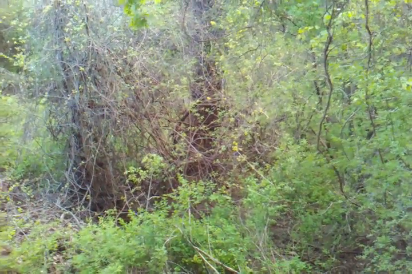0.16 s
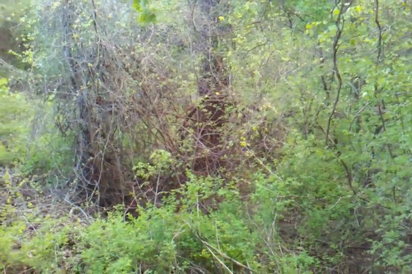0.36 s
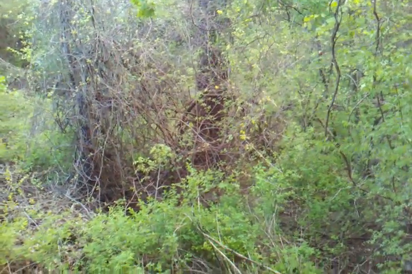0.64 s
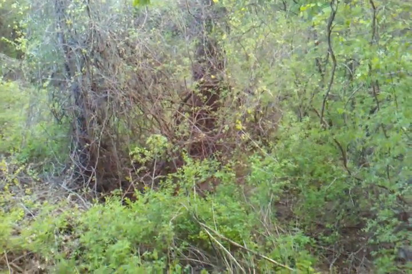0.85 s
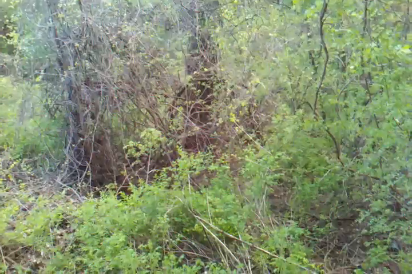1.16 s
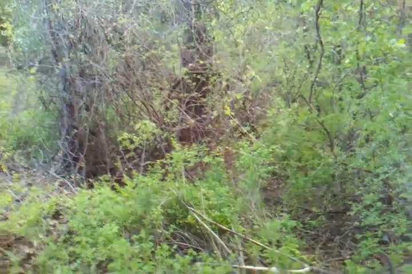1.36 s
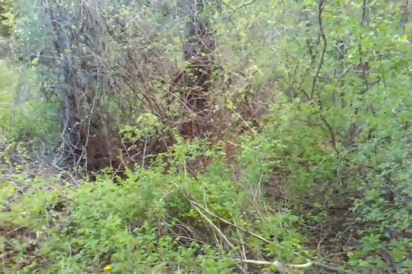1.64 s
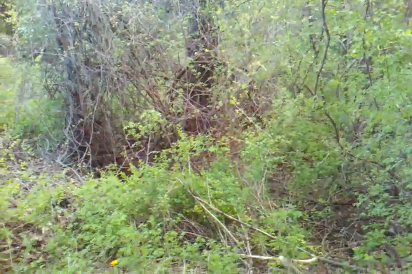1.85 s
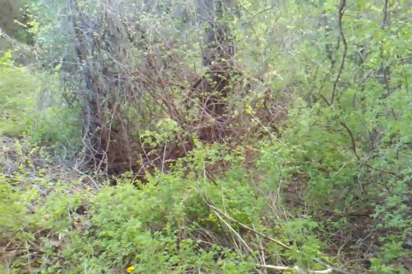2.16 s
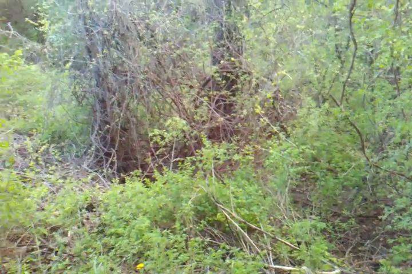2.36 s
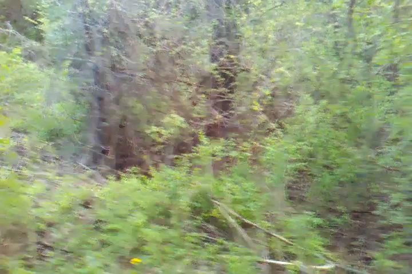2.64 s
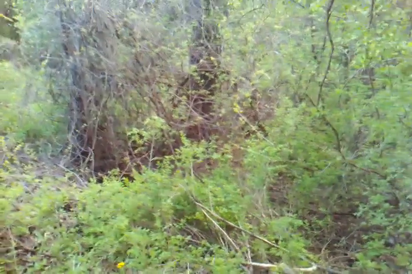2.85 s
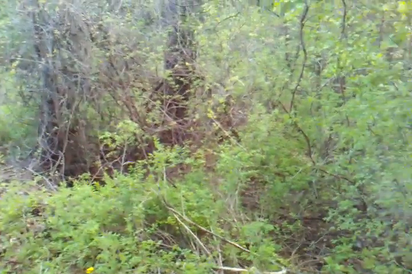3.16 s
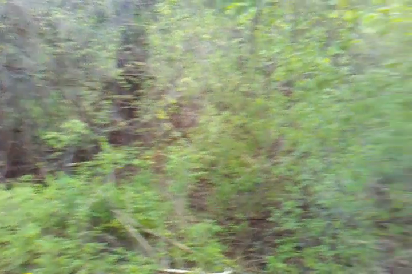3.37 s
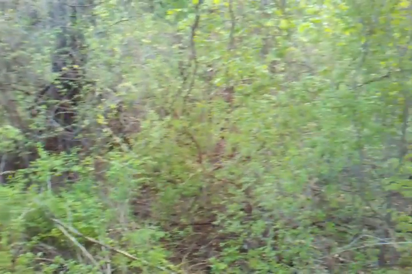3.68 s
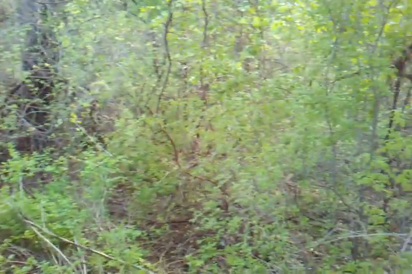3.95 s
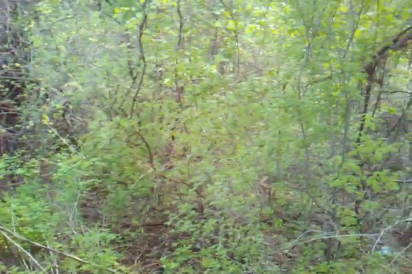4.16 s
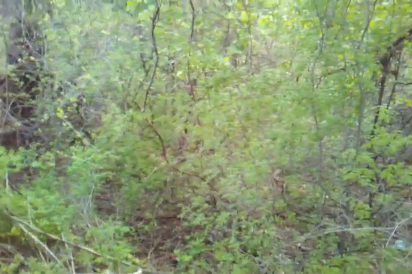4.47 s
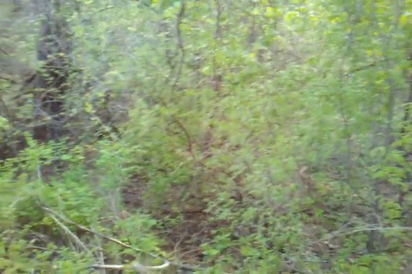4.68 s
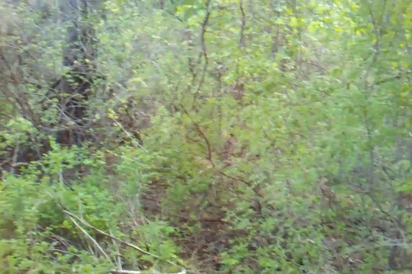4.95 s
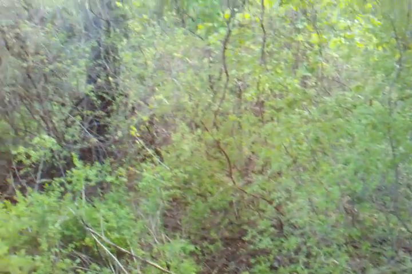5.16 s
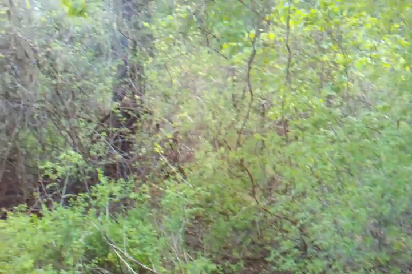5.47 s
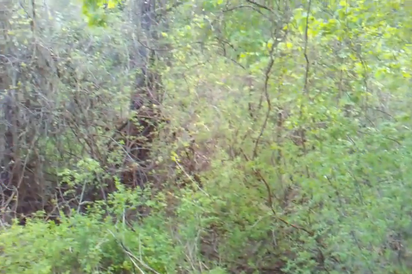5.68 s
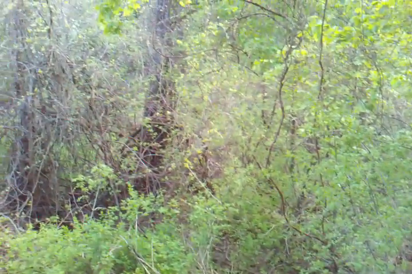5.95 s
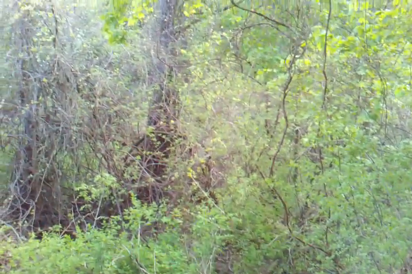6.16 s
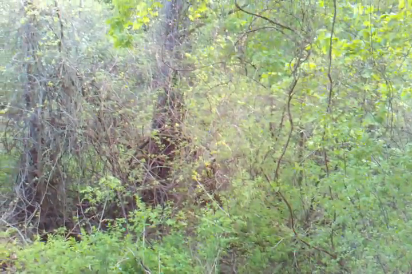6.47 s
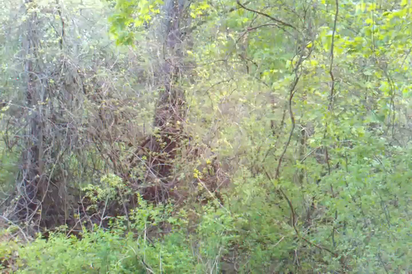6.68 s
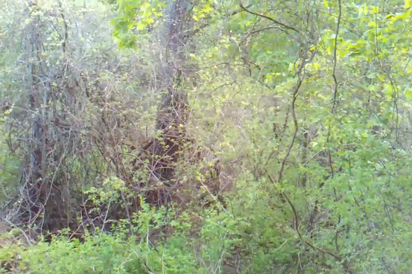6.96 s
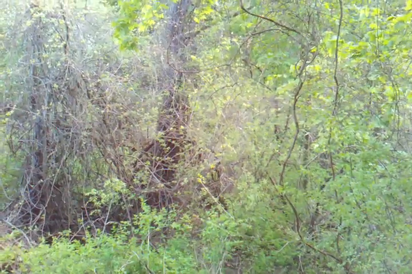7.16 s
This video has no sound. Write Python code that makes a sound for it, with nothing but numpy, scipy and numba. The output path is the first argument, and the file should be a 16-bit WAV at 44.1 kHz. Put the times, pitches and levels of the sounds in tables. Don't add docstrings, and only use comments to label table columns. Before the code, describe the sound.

A fox's hoarse scream is already ending as it begins, its echo fading among trees. Three faint breathy crow caws follow far off, with low engine notes barely audible. Then small dry rustles, fabric rubs and sharp little twig clicks come very near the wide stereo microphone. It calms, and late on a second raspy, rising scream bursts out and decays through the wood, over quiet wind, traffic rumble and fine leaf hiss.

```python
import sys
import numpy as np
from scipy import signal
from scipy.fft import rfft, irfft, next_fast_len
from scipy.io import wavfile
from scipy.ndimage import uniform_filter1d
from numba import njit

SR = 44100
rng = np.random.default_rng(int(sys.argv[2]) if len(sys.argv) > 2 else 0)


def voltage_ratio(decibels):
    exponent = np.asarray(decibels, float) / 20
    return 10 ** exponent


def persist_wave(psi):
    counts = np.round(np.clip(psi, -1, 1) * 32767).astype(np.int16)
    wavfile.write(sys.argv[1], SR, np.atleast_2d(counts).T)


N = 322750
LEAD = SR // 5


def at_hz(points, hz):
    point_hz, value = np.array(points).T
    return np.interp(np.log(hz + 1), np.log(point_hz), value)


def rms_one(x):
    return x / np.sqrt(np.mean(x ** 2) + 1e-20)


def in_time(tables, lead=0):
    t = np.arange(-lead, N) / SR
    rows = np.array([row for table in tables for row in table], float)
    columns = [np.interp(t, rows[:, 0], column) for column in rows[:, 1:].T]
    sounding = np.zeros(len(t), bool)
    for table in tables:
        start = table[0][0] if table[0][0] > 0 else -1
        sounding |= (t >= start) & (t <= table[-1][0])
    return [uniform_filter1d(sounding * 1., size=400)] + columns


def coloured(x, spectrum):
    size = next_fast_len(x.shape[-1])
    gain = voltage_ratio(at_hz(spectrum, np.fft.rfftfreq(size, 1 / SR)))
    return irfft(rfft(x, size) * gain, size)[..., :x.shape[-1]]


def band(x, low_hz, high_hz):
    return signal.sosfilt(signal.butter(2, [low_hz, high_hz], "band", fs=SR, output="sos"), x)


def drift(rate_hz, size):
    r = np.exp(-2 * np.pi * rate_hz / SR)
    return rms_one(signal.lfilter([1], [1, -2 * r, r * r], rng.standard_normal(size + SR))[SR:])


@njit
def resonate(x, hz, r):
    y = np.zeros(len(x))
    for i in range(2, len(x)):
        push = (1 - r * r) / 2 * (x[i] - x[i - 2])
        y[i] = push + 2 * r * np.cos(2 * np.pi * hz[i] / SR) * y[i - 1] - r * r * y[i - 2]
    return y


def steep(x, hz, width_hz):
    hz = hz + np.zeros(len(x))
    once = resonate(x, hz, np.exp(-np.pi * width_hz / SR))
    return rms_one(resonate(once, hz, np.exp(-2.5 * np.pi * width_hz / SR)))


def even(x, seconds):
    return x / np.sqrt(uniform_filter1d(x ** 2, size=int(seconds * SR)) + 1e-9)


# (frequency [Hz], density [dB per Hz])
AIR_SUM = [(30, -105), (70, -83.5), (130, -76), (500, -93.5), (1200, -104), (2000, -111), (4000, -117),
           (6000, -114), (8500, -106), (10500, -113), (14000, -113)]
AIR_DIFFERENCE = [(30, -110), (70, -103), (130, -89.5), (500, -101), (1000, -106), (2500, -115),
                  (4000, -112), (6000, -117), (8500, -109), (10500, -111), (14000, -112)]


def air():
    white = rng.standard_normal((2, N)) * np.sqrt(SR / 2)
    both = np.array([coloured(white[0], AIR_SUM), coloured(white[1], AIR_DIFFERENCE)])
    return both * voltage_ratio(0.16 * drift(0.36, N))


# (start [s], length [s], first pitch [Hz], last pitch [Hz], level [dB])
DRONE_NOTES = [
    (0.962, 0.58, 300, 307, -70.5),
    (1.608, 0.63, 323, 349.4, -74),
    (1.703, 0.586, 203, 218.4, -65.5),
]


def drone():
    out, t = 0, np.arange(N) / SR
    edge_s = .04
    for start, length, first_hz, last_hz, level_db in DRONE_NOTES:
        on = np.clip(np.minimum(t - start, start + length - t) / edge_s, 0, 1)
        hz = np.interp(t, [start, start + length], [first_hz, last_hz]) + 4.07 * drift(2.96, N)
        level = voltage_ratio(level_db + 7.5 + 2.8 * drift(27, N))
        out = out + on * level * np.sin(2 * np.pi * np.cumsum(hz) / SR)
    return out * np.array([[1], [.3]])


# (time [s], bright ring level [dB], bright ring [Hz], stem ring level [dB], stem ring [Hz])
TWIG_TICKS = [(1.942, -47, 7800, -73, 1290), (1.9913, -48, 7600, -67, 1349),
              (2.2894, -21.5, 7070, -38.5, 1457), (2.6702, -76, 3420, -45.5, 1620),
              (3.031, -51, 4240, -41, 1910), (3.5194, -63, 3600, -61, 1500), (3.74, -46, 4050, -60, 1840),
              (3.7588, -69, 3600, -47, 1680), (3.848, -57, 7000, -60, 1730),
              (4.1531, -27.5, 4080, -77, 1860), (4.275, -47.5, 7500, -72, 2050),
              (4.3062, -49, 7300, -61, 2040)]


def ticks():
    out, t = np.zeros((2, N)), np.arange(600) / SR
    chance = rng.standard_normal((len(TWIG_TICKS), 2, 600))
    shape = t / 0.00044 * np.exp(1 - t / 0.00039)
    snap_db = 1
    for (start, bright_db, bright_hz, stem_db, stem_hz), noise in zip(TWIG_TICKS, chance):
        crack = (bright_hz / 7000) ** 3 * rms_one(band(noise, 5000, 11700))
        bright = np.sin(2 * np.pi * bright_hz * t) + 0.31 * np.sin(np.pi * 1.05 * bright_hz * t)
        bright = bright + .5 * crack + 0.31 * rms_one(band(noise, 2960, 8800))
        stem = np.sin(2 * np.pi * stem_hz * t) * np.exp(-t / 0.0015)
        stem = stem + np.sin(2 * np.pi * 1.806 * stem_hz * t) * np.exp(-t / 0.002)
        snap = voltage_ratio(stem_db + snap_db) * band(np.exp(-t / 0.00006), 945, 8200) * 2.7
        tick = voltage_ratio(bright_db) * bright * shape + voltage_ratio(stem_db) * stem + snap
        at = round(start * SR)
        out[:, at:at + 600] += voltage_ratio(-4) * tick * [[1], [.5]]
    return out


# (start [s], length [s], peak hiss [dB], rub re hiss [dB], dull rub re hiss [dB])
STROKES = [(1.935, 0.022, -59, -7, -26), (2.34, 0.18, -64, 1.5, 3), (2.56, 0.07, -64, 0.5, 3.5),
           (3.022, 0.068, -54.5, -16, -1.5), (3.09, 0.1, -46, -6, -2), (3.232, 0.11, -49.5, 1.5, -3.5),
           (3.325, 0.13, -51, 2.5, -1), (3.728, 0.061, -63, -1, 6), (4.151, 0.016, -64, 5, -10.5),
           (4.274, 0.015, -54, -1, -16), (4.411, 0.22, -42.5, -12, -7), (5.256, 0.063, -63, -1, -18.5)]
DRAGS = [(1.77, .16, -70, -12, -14), (1.96, 0.37, -69, -3, -1), (2.9, 0.14, -57.5, -3, -2),
         (3.48, .07, -65.5, -1, 8.5), (3.62, 0.11, -65.5, 2.5, 7.5), (3.19, 0.046, -60, -3, -3),
         (4.043, 0.11, -45, -9, -16), (4.15, 0.088, -51, -0.5, -5.5), (4.29, 0.039, -53.5, 0, -6),
         (4.33, 0.12, -55.5, -10.5, -4.5), (5.15, .07, -69, -11, -9)]
# (share of length [0-1], level re peak [dB])
STROKE_COURSE = [(0, -8.5), (.15, -1.1), (.55, -1.55), (1, -20.5)]
DRAG_COURSE = [(0, -4.5), (.15, -5), (.65, 0.1), (1, -14)]


def pressure():
    gains = np.zeros((4, N))
    for touches, course in ((STROKES, STROKE_COURSE), (DRAGS, DRAG_COURSE)):
        for start, length, db, middle_db, low_db in touches:
            share = np.arange(int(length * SR)) / (length * SR)
            push = voltage_ratio(db + np.interp(share, *np.transpose(course)))
            top_db = -7 - 0.34 * max(middle_db, -18)
            layers = voltage_ratio(np.array([0, top_db, middle_db, low_db]))
            at = int(start * SR)
            gains[:, at:at + len(share)] += layers[:, None] * push
    return uniform_filter1d(gains, size=200)


# (frequency [Hz], level [dB])
FIBRE_HISS = [(5200, -10), (6300, 4.5), (7500, 8.5), (8700, 1), (9500, -30), (10500, -49)]
FIBRE_TOP = [(7800, -36.5), (8800, -5), (10000, -6), (12000, -9), (14000, -16.5)]


def strokes():
    hiss_gain, top_gain, middle_gain, low_gain = pressure()
    grains = rng.standard_normal((2, N)) * voltage_ratio(1.5 * rng.exponential(1, (2, N)))
    hiss = rms_one(coloured(grains, [(3500, -97)] + FIBRE_HISS)) * voltage_ratio(0.63 * drift(65, N))
    top = voltage_ratio(3.0) * rms_one(coloured(grains, FIBRE_TOP)) * voltage_ratio(1.2 * drift(50, N))
    middle = voltage_ratio(-8.5) * rms_one(band(band(grains, 3460, 6550), 3370, 6200)) * np.array([[1], [.6]])
    low = voltage_ratio(-8.5) * rms_one(band(band(grains, 1220, 2680), 920, 3260)) * np.array([[1], [.7]])
    return voltage_ratio(-3.5) * (hiss_gain * hiss + top_gain * top + middle_gain * middle + low_gain * low)


# (frequency [Hz], time to fall 60 dB [s])
WOODS_T60 = [(400, 0.51), (1200, 0.49), (2200, 0.63), (4500, 0.45), (9000, 0.64)]
# (frequency [Hz], level [dB])
WOODS_COLOUR = [(600, -6), (1200, 17.5), (2200, 8.5), (4000, 21), (8000, 3.5)]
# (frequency [Hz], level [dB])
FAR_TREES = [(800, -22), (1060, -5.5), (1170, -6.5), (1285, -10.5), (1700, -14), (2500, -8.5),
             (4000, -12.5), (7000, -45)]


def woods(x):
    t = np.arange(int(1.6 * SR)) / SR
    edges_hz = 300 * 2 ** np.arange(0, 5.6, .5)
    white, echoes = rng.standard_normal((2, 2, len(t))), 0
    for low, high in zip(edges_hz, edges_hz[1:]):
        fall = voltage_ratio(-60 * t / at_hz(WOODS_T60, np.sqrt(low * high)))
        echoes = echoes + band(white[0], low, high) * fall
    near = coloured(echoes, WOODS_COLOUR) * (1 - np.exp(-t / 0.0035))
    swell = 1 - np.exp(-(t / 0.23) ** 3)
    late = coloured(white[1], FAR_TREES) * voltage_ratio(7.5 - 60 * t / 1.25) * swell
    return signal.fftconvolve(x[None], near + late)[:, :len(x)] / np.sqrt(SR)


# (centre [Hz], width [Hz], level [dB])
RASP = [(2850, 600, 19), (3600, 263, 15), (4720, 2200, -7), (5150, 170, -36)]
# (centre [Hz], width [Hz])
CHEST = (938, 230)
# (time [s], upper resonance [Hz], level re second [dB], top [Hz], level re rasp [dB])
UPPER_THROAT = [(.5, 2180, -7, 7240, -8), (5.0, 2090, -24, 6400, -8.5)]
# (time [s], resonance [Hz], level re rasp [dB])
LIPS = [(.5, 4080, -6), (5.0, 4126, -13)]


def voice(tables, jitter, breath, throb_db, width_hz, second_width_hz, upper_db):
    size = N + LEAD
    on, level_db, low_hz, second_hz, second_db, rasp_db, chest_db = in_time(tables, LEAD)
    chaos = np.clip((rasp_db + 36) / 16, .35, 1)
    phase = np.cumsum(low_hz * (1 + chaos * jitter * drift(150, size))) / SR
    pulses = rms_one(np.diff(np.floor(phase), prepend=0) * voltage_ratio(1.3 * drift(450, size)))
    source = (pulses + chaos * breath * rng.standard_normal(size)) * voltage_ratio(throb_db * drift(89, size))

    second_hz = second_hz * (1 + .025 * drift(9.4, size))
    low_hz = low_hz * (1 + .015 * drift(25.4, size))
    low = even(steep(source, low_hz, width_hz) + .45 * steep(source, low_hz, 35), .025)
    second = even(steep(source, second_hz, second_width_hz) + .35 * steep(source, second_hz, 40), .025)
    strain = np.clip((rasp_db + 23) / 9, 0, 1)
    low = low * voltage_ratio(-4.5 * strain) + strain * voltage_ratio(-4.5) * steep(source, 1.18 * low_hz, 450)

    _, lips_hz, lips_db = in_time([LIPS], LEAD)
    _, upper_hz, mouth_db, top_hz, top_db = in_time([UPPER_THROAT], LEAD)
    upper = voltage_ratio(mouth_db + upper_db) * steep(source, upper_hz, 250)
    rasp = rms_one(sum(voltage_ratio(db) * steep(source, hz, width) for hz, width, db in RASP))
    rasp = rasp + voltage_ratio(top_db) * steep(source, top_hz, 520) + voltage_ratio(lips_db) * steep(source, lips_hz, 500)
    chest = voltage_ratio(chest_db) * even(steep(source, *CHEST), 0.019)
    throat = low + chest + voltage_ratio(second_db) * (second + upper) + voltage_ratio(rasp_db + 4.5) * rasp
    return on * voltage_ratio(level_db) * throat


# (start [s], length [s], peak level [dB], low resonance [Hz])
CAWS = [
    (0.638, 0.27, -50, 1372),
    (1.329, 0.21, -50.5, 1377),
    (2.01, 0.22, -51, 1335),
]
# (share of length [0-1], level re peak [dB], low resonance re its top [ratio],
# second resonance [Hz], effort as second resonance level [dB])
CAW_SHAPE = [(0, -16, 1, 1500, 0), (.17, -4.5, .99, 1900, -12), (0.361, -7, .98, 1950, -8),
             (.58, -16.5, .9, 1688, 3.5), (.82, -13, 0.98, 1550, 0), (1, -15.5, 0.97, 1480, 3)]


def crow():
    rasp_db, chest_db = -23, -40
    throat = [[(start + share * length, db + drop, hz * ratio, second_hz, second_db, rasp_db, chest_db)
               for share, drop, ratio, second_hz, second_db in CAW_SHAPE]
              for start, length, db, hz in CAWS]
    return voltage_ratio(-7.0) * voice(throat, jitter=.1, breath=2.74, throb_db=3.0,
                             width_hz=160, second_width_hz=98, upper_db=-26)


# (time [s], level [dB], low throat resonance [Hz], strain as rasp re level [dB])
SCREAMS = [
    [(0, -28, 1230, -7), (.06, -35, 1220, -6), (.12, -32, 1210, -14), (.17, -33, 1190, -23.5),
     (.22, -37, 1100, -20.5), (.26, -47, 1080, -18), (.33, -44, 1138, -23.5)],
    [(5.49, -40, 874.6, -34), (5.508, -34.5, 901.7, -25.5), (5.513, -23.5, 911, -35),
     (5.545, -25.5, 980, -15.5), (5.63, -26.5, 1150, -13), (5.71, -28.5, 1200, -16),
     (5.8, -25.5, 1170, -25), (5.85, -31, 1110, -33), (5.92, -47.5, 1100, -20.5)],
]


def fox():
    second_hz = 1637
    throat = [[(s, db, hz, second_hz, 5 + 0.48 * strain, strain, -5 + 0.18 * strain)
               for s, db, hz, strain in scream] for scream in SCREAMS]
    return voltage_ratio(-11.5) * voice(throat, jitter=.25, breath=0.68, throb_db=0.5,
                              width_hz=124, second_width_hz=327, upper_db=3.0)


def animals():
    near_fox, far_crow = fox(), crow()
    twigs = rng.standard_normal(3000) * np.exp(-np.arange(3000) / 600)
    askew = signal.fftconvolve(near_fox, twigs / np.linalg.norm(twigs))[:N + LEAD]
    tilt = [(700, -15.5), (1500, -1.0), (3000, -7.5), (6000, -2.5)]
    tail = woods(voltage_ratio(2.5) * near_fox + voltage_ratio(8.0) * far_crow)
    total = near_fox + far_crow + tail[0]
    difference = coloured(askew + voltage_ratio(5.5) * tail[1], tilt)
    return np.array([total, difference])[:, LEAD:]


def scene():
    total, difference = air() + drone() + ticks() + strokes() + animals()
    return np.array([total + difference, total - difference])


# (frequency [Hz], share fed across [0-1])
CROSS_FEED = [(4600, 0.36), (5900, 0.2), (7300, 0.12), (8800, 0.25), (10300, 0.29), (11800, 0.21),
              (14000, 0.57)]


def widen(dry):
    lag, cutoff_hz = 15, 13950
    hz = np.fft.rfftfreq(N + 50, 1 / SR)
    share = np.where(hz < 4600, 1, at_hz(CROSS_FEED, hz))
    across = share * np.exp(-2j * np.pi * hz * lag / SR)
    ports = rfft(dry * np.minimum(np.arange(N) / 60, 1), N + 50)
    wide = irfft((ports - across * ports[::-1]) * (hz < cutoff_hz), N + 50)[:, :N]
    return wide * voltage_ratio([[-.4], [.4]])


def band_limit(x):
    return signal.sosfilt(signal.butter(12, 14910, fs=SR, output="sos"), x)


def record(dry):
    wide = widen(dry)
    return band_limit(wide)


dry = scene()
out = record(dry)
persist_wave(out)
```